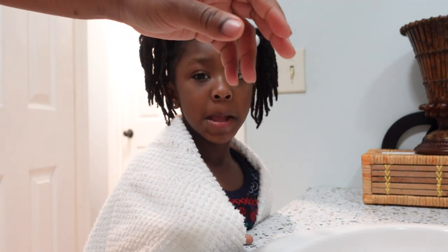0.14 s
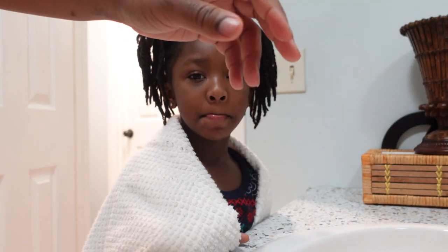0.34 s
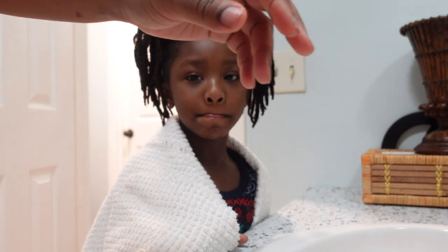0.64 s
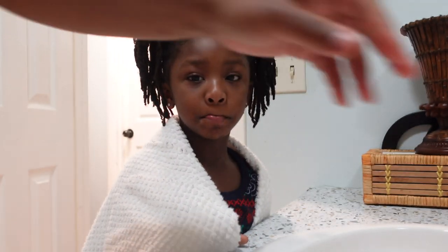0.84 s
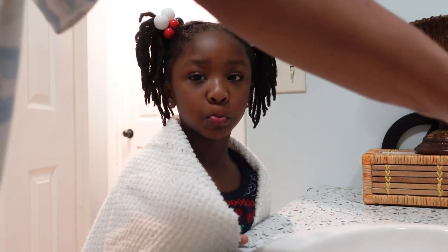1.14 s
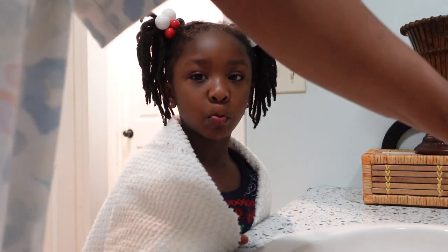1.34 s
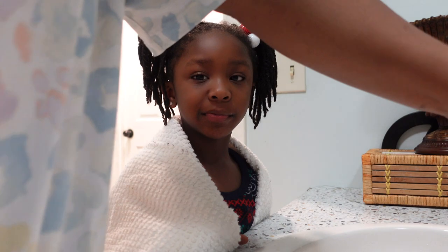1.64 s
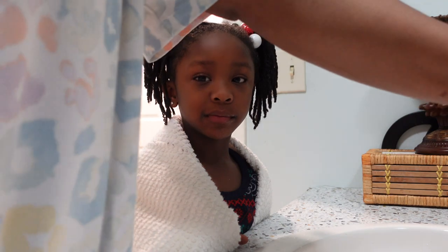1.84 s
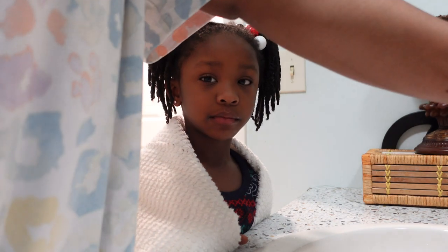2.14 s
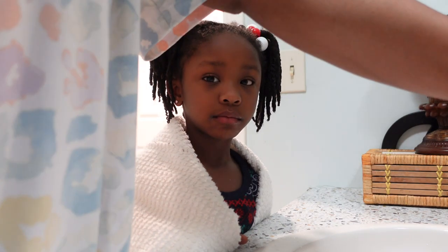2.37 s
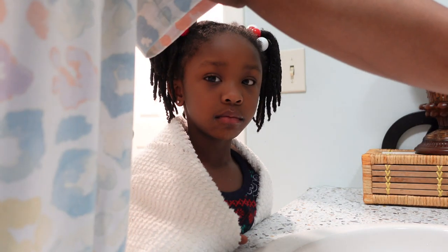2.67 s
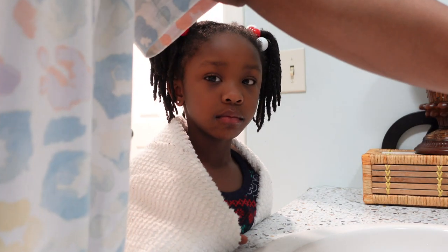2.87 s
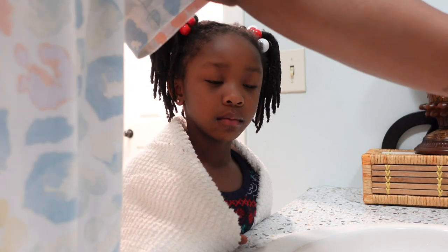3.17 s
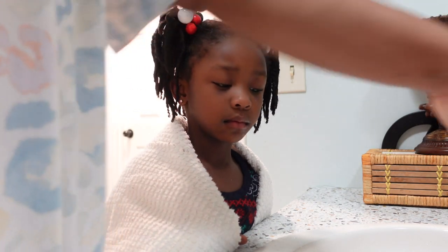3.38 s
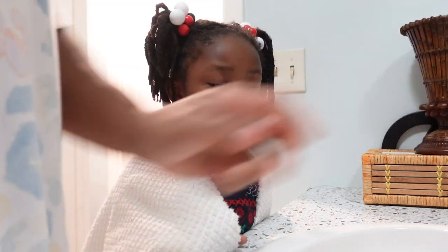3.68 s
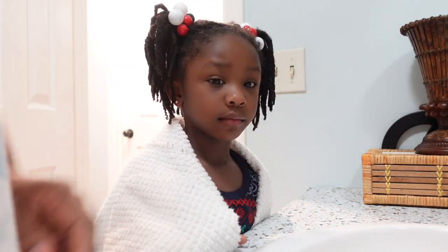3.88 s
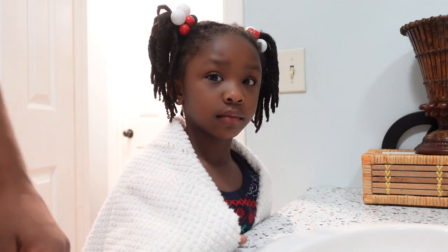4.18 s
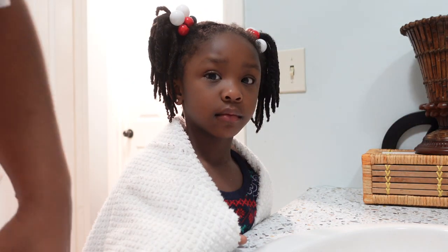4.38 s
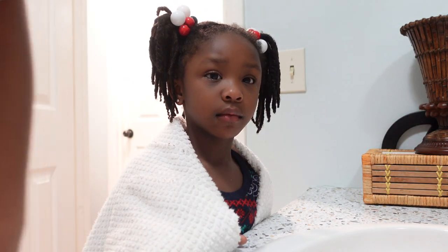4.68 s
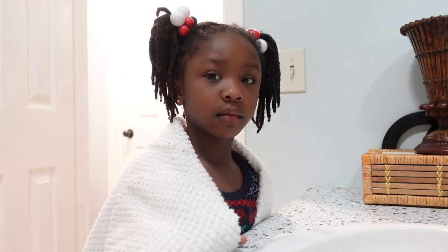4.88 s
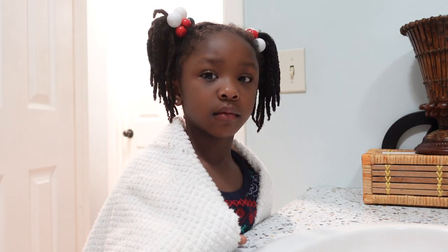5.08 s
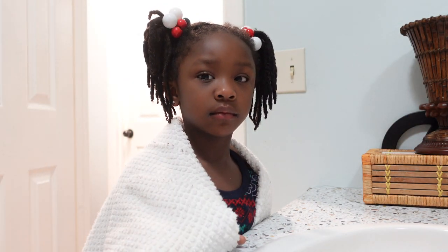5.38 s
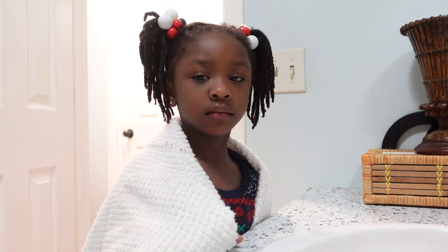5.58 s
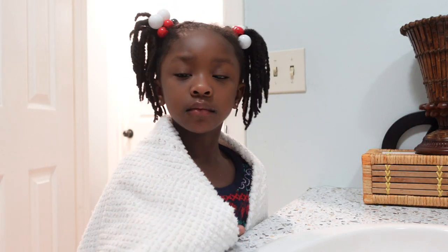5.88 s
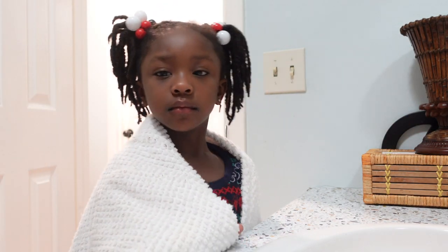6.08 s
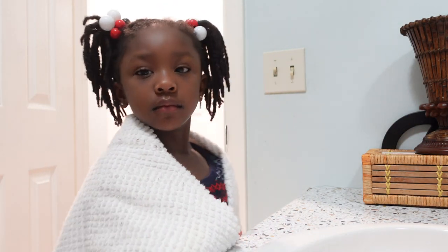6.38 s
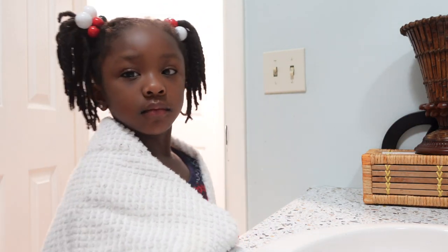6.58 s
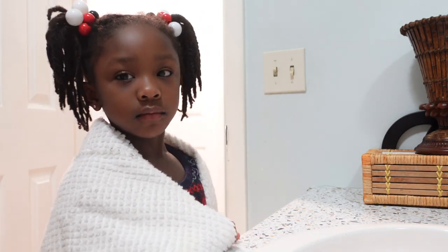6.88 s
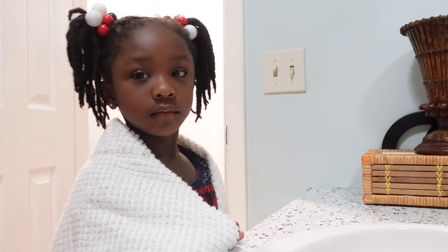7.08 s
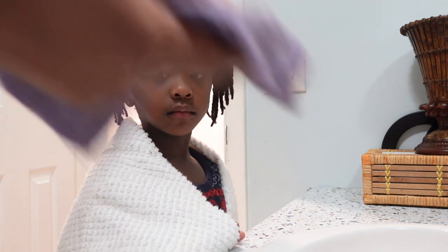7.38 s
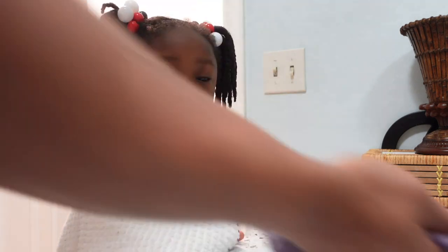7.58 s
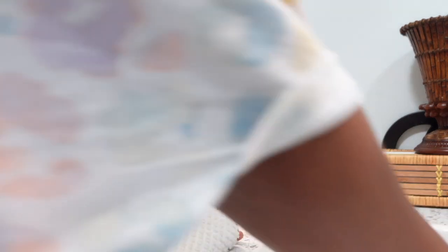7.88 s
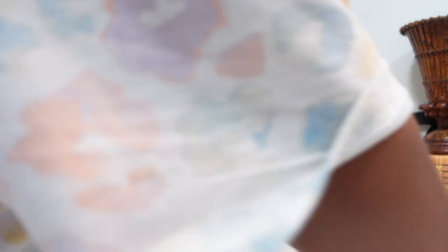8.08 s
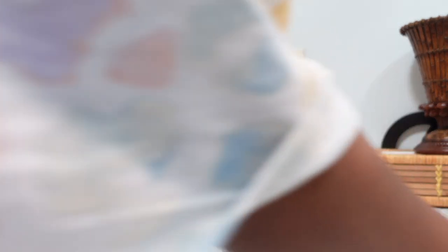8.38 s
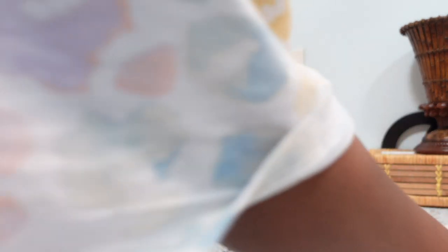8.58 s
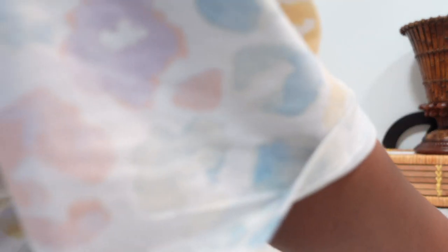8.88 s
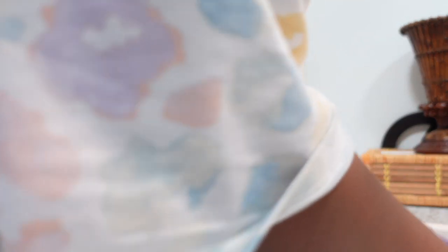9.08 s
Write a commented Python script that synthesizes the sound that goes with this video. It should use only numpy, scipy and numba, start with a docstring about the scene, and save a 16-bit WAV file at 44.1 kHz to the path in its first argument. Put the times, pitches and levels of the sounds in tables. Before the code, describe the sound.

A small bathroom holds a quiet steady rush with a faint whistle, a few light handling ticks and one soft bloop. Then a tap opens, close and to the right of the microphone, and runs hard into the sink. The jet hisses, spray patters on the bowl, water bubbles and the filling drain gulps now and then. Near the end a cloth softens the stream, which keeps running.

```python
"""First a steady rush with a faint whistle in a small bathroom, a few handling ticks and one soft bloop.
At 1.8 s the tap opens, right of the microphone, and runs hard into the basin: jet and valve hiss, spray
patters on the bowl, bubbles ring in the churned water and trapped air throbs and gulps in the filling
drain. Near the end a cloth softens the stream. Close, hard walls add a short tail."""
import sys
import numpy as np
from scipy import signal
from scipy.fft import rfft, irfft, next_fast_len
from scipy.io import wavfile
from numba import njit

SR = 44100
rng = np.random.default_rng(int(sys.argv[2]) if len(sys.argv) > 2 else 0)


def materialize(psi):
    """Save the field psi as 16-bit PCM at rate SR to the path in sys.argv[1].

    A 1-D psi becomes a single channel; in a 2-D psi each row is a channel.
    """
    bounded = np.clip(np.atleast_2d(psi).T, -1, 1)
    quanta = np.round(bounded * 32767).astype(np.int16)
    wavfile.write(sys.argv[1], SR, quanta)


N = 407043
TIME = np.arange(N) / SR

# spectral shapes of room tone, jet and spray: f/Hz, relative level/dB
RUSH_SPECTRUM = [(40, -36), (85, -11), (135, -0.5), (300, 3.5), (450, -15), (650, -4.5), (1400, -8.5),
                 (2800, -14), (7000, -32.5), (16000, -41)]
JET_SPECTRUM = [(100, -12), (200, -11.5), (500, -16.5), (1300, -24), (2500, -4.5), (5000, -1), (9000, 2),
                (16000, -10.5)]
SPRAY_SPECTRUM = [(500, -15), (1200, -10), (2400, 0.5), (3000, 2.5), (4500, -2.5), (6500, 1), (9000, -1),
                  (12000, -25), (16000, 0)]
# handling ticks and thuds at the tap: t/s, level/dB, centre f/Hz, decay/s
HANDLING_TICKS = [(.615, -39.5, 2000, .007), (.64, -41, 520, 0.032), (1.036, -50.5, 8140, 0.018),
                  (1.052, -38, 132, .025), (1.312, -55, 8500, .016), (1.476, -37, 202, .028),
                  (1.515, -55, 6500, .022), (1.82, -37.5, 164, 0.069), (2.15, -35.5, 190, .12)]
# the tap opens in two turns: t/s, relative flow level/dB
TAP_FLOW = [(1.8, -8), (2.0, -5), (2.22, -3), (2.33, 3.5)]
# pitch of the bubble cloud, sinking as the cloud grows: t/s, f/Hz
CLOUD_PITCH = [(1.85, 1070), (4.0, 1063), (4.8, 1017), (7.6, 970), (7.95, 834), (9.2, 840)]
# the drain swallows harder for a moment: t/s, level/dB, length/s
DRAIN_SURGES = [(2.301, -32, .06), (2.88, -26, 0.093), (3.253, -34, 0.11), (4.064, -35, 0.39),
                (4.334, -27, 0.043), (5.2, -36, .25)]
# the jet hits the drain mouth squarely: t/s, level/dB, length/s
MOUTH_HITS = [(2.176, -23, 0.044), (2.277, -21, 0.043), (2.897, -27.5, .06), (3.299, -26, .035)]
# modes of the metal drain fitting: f/Hz, width/Hz, relative level/dB
FITTING_MODES = [(2624, 114, 13.5), (3070, 210, 7.5), (3925, 116, 18), (5240, 870, 9)]
# the loudest splashes: t/s, level/dB, centre f/Hz, decay/s
LOUD_SPLASHES = [(2.386, -20, 3950, 0.0087), (2.619, -15, 4000, 0.0063), (2.678, -17, 2640, 0.017),
                 (2.92, -31, 810, .05), (2.988, -12, 4060, 0.0086), (3.05, -19, 3100, .03),
                 (3.281, -15.5, 2430, .011), (3.437, -20.5, 2760, 0.016), (3.726, -15, 3750, 0.03),
                 (4.209, -20, 2650, .016), (4.674, -9.5, 2600, 0.0051), (4.772, -19, 4740, 0.012),
                 (4.997, -18, 3860, 0.021), (5.198, -15, 4300, 0.011), (5.447, -18, 8600, 0.014),
                 (5.742, -17.5, 9600, 0.017), (5.94, -21, 2100, .05), (6.036, -16.5, 3150, 0.0099),
                 (6.104, -16.5, 5000, 0.013), (6.765, -15, 4600, 0.0098), (7.207, -16.5, 2980, 0.015),
                 (7.49, -18.5, 4900, 0.042), (7.7, -21.5, 1320, 0.062)]
# gulps of air in the drain: t/s, level/dB, f/Hz
DRAIN_GULPS = [(2.812, -6.5, 358), (3.203, -13, 358), (3.205, -5, 1160), (3.3, -11, 1140),
               (4.291, -13.5, 286), (4.299, -4.5, 1166), (4.609, -18.5, 279.4), (6.223, -21.5, 278),
               (7.547, -17, 293)]
# resonances of bowl and pipework: f/Hz, width/Hz, lift/dB
BOWL_MODES = [(1410, 50, 4), (1740, 150, 6), (1900, 80, 8.5), (2225, 40, 4), (2615, 60, 4), (3310, 110, 8),
              (4020, 220, 6), (4780, 70, 3), (5910, 100, 2), (6420, 70, 4), (7400, 330, 2), (11700, 200, 3),
              (13580, 520, 3)]
# the basin as heard from the microphone: f/Hz, left minus right level/dB
BASIN_BALANCE = [(250, -1.5), (1000, -4.2), (2000, -2.3), (4500, -4.2), (10000, 0)]

OPENING_S = (1.771, 1.803)   # the valve goes from shut to open
COVER_AT_S, COVER_TAKES_S = 2.29, 1.31   # water spreads over the drain fitting
FLOOD_AT_S, FLOOD_TAKES_S = 4.22, 0.29   # the drain floods
CLOTH_AT_S, CLOTH_TAKES_S = 7.6, 0.26   # a cloth is held in the stream


def from_db(db):
    """Decibels to gain."""
    return 10 ** (np.asarray(db) / 20)


def unit_rms(x):
    """Scale to an rms of 1."""
    return x / np.sqrt(np.mean(x ** 2) + 1e-20)


def at_hz(points, hz):
    """Read a spectrum on a log-frequency axis."""
    f, value = np.transpose(points)
    return np.interp(np.log(hz + 1e-9), np.log(f), value)


def ramp(at_s, takes_s):
    """Go from 0 to 1, starting at at_s."""
    return np.clip((TIME - at_s) / takes_s, 0, 1)


def swells(steady, rows):
    """A gain with bell-shaped swells added in power."""
    power = sum(from_db(db) ** 2 * np.exp(-2 * np.minimum(((TIME - s) / length) ** 2, 20))
                for s, db, length in rows)
    return np.sqrt(steady ** 2 + power)


def drift(rate_hz):
    """A smooth random wander of spread 1."""
    pole = np.exp(-80 * np.pi * rate_hz / SR)
    slow = signal.lfilter([1], [1, -2 * pole, pole * pole], rng.standard_normal(N // 40 + 2002))[2000:]
    return np.interp(np.arange(N) / 40, np.arange(len(slow)), unit_rms(slow))


def band(x, low_hz, high_hz):
    """Butterworth band-pass."""
    edges = [low_hz, min(high_hz, SR / 2 - 1000)]
    return signal.sosfilt(signal.butter(2, edges, "band", fs=SR, output="sos"), x)


def resonate(x, hz, width_hz, passes=1):
    """A steady resonance with gain 1 at its peak."""
    r = np.exp(-np.pi * width_hz / SR)
    feedback = [1, -2 * r * np.cos(2 * np.pi * hz / SR), r * r]
    for _ in range(passes):
        x = signal.lfilter(np.array([1, 0, -1]) * (1 - r * r) / 2, feedback, x + 1e-18)
    return x


@njit
def glide(x, hz, width_hz, passes):
    """A resonance whose centre moves."""
    out = x.copy()
    for _ in range(passes):
        state = 0j
        for i in range(len(x)):
            state = state * np.exp((2j * hz[i] - width_hz) * np.pi / SR) + out[i]
            out[i] = state.real
    return out


def impacts(per_s, spread_db):
    """Random clicks, many small and a few large."""
    sizes = from_db(spread_db * np.minimum(rng.exponential(1, N), 6)) * rng.choice([-1, 1], N)
    return unit_rms(sizes * (rng.random(N) < per_s / SR))


def colour(sources, spectrum, flicker_db, flicker_hz):
    """Half-octave bands drawn in turn from two sources; neighbours flare up together."""
    edges = 31 * 2 ** (np.arange(20) / 2)
    out, below = 0, drift(flicker_hz)
    for k, (low, high) in enumerate(zip(edges, edges[1:])):
        above = drift(flicker_hz)
        band_db = at_hz(spectrum, np.sqrt(low * high)) + flicker_db * (below + above)
        out = out + band(sources[k % 2], low, high) * from_db(band_db)
        below = above
    return unit_rms(out)


def bursts(rows, span, spread_db, attack_share=.35):
    """Clusters of clicks that rise quickly and die away, each in its own band."""
    out, clicks = np.zeros(N), impacts(9000, spread_db)
    for s, db, hz, decay in rows:
        live = slice(int(s * SR), int((s + 5 * decay) * SR))
        age = (TIME[live] - s) / decay
        grains = unit_rms(band(clicks[live], hz / (1 + span), hz * (1 + span)))
        out[live] += from_db(db) * grains * np.clip(age / attack_share, 0, 1) * np.exp(attack_share - age)
    return out


def room_rush(db=-45, whistle_db=-47, fade_db_per_s=3):
    """Room tone around the microphone: a steady rush and a faint two-note whistle that dies away."""
    white = rng.standard_normal((2, N))
    low_note = resonate(white[0], 885, 26, passes=2)
    high_note = resonate(resonate(white[1], 1040, 140), 1230, 110)
    whistle = from_db(whistle_db - fade_db_per_s * TIME) * unit_rms(low_note + 0.49 * high_note)
    return from_db(db) * colour(white, RUSH_SPECTRUM, flicker_db=0.6, flicker_hz=28) + whistle


def handling():
    """A hand at the tap makes small ticks and thuds."""
    return bursts(HANDLING_TICKS, span=0.33, spread_db=3)


def bloop(at_s, hz, db, length_s):
    """One soft, nearly pure note swells and stops."""
    return from_db(db) * np.exp(-((TIME - at_s) / length_s) ** 2) * np.sin(2 * np.pi * hz * TIME)


def jet(cloth, db=-31, cloth_db=-1.5):
    """The aerated stream hisses smoothly, a little less in the cloth."""
    hiss = colour(rng.standard_normal((2, N)), JET_SPECTRUM, flicker_db=.3, flicker_hz=20)
    return from_db(db + cloth_db * cloth) * hiss


def spray(flow_db, covered, cloth, db=-28.5, wet_db=2, cloth_db=-2.5):
    """Droplets patter on the bowl in clumps; the cloth softens and steadies them."""
    drops = [impacts(per_s=4500, spread_db=2.5) for _ in range(2)]
    unrest_db = 0.46 + 0.59 * from_db(flow_db) * (1 - cloth)
    patter = colour(drops, SPRAY_SPECTRUM, flicker_db=unrest_db, flicker_hz=29)
    level_db = db + flow_db + wet_db * covered + cloth_db * cloth
    return from_db(level_db + unrest_db * drift(93)) * patter


def bubbles(low_hz, high_hz, per_s, cycles, spread_db, sizes=16):
    """Bubbles of assorted sizes, each ringing briefly."""
    births, size = impacts(per_s, spread_db), rng.integers(0, sizes, N)
    pitches = np.geomspace(low_hz, high_hz, sizes)
    return unit_rms(sum(resonate(births * (size == k), hz, 2 * hz / cycles)
                        for k, hz in enumerate(pitches)))


def pinch_off(rows, attack_s, rise):
    """Bubbles pinch off and ring, rising slightly in pitch as they die."""
    out = np.zeros(N)
    for s, db, hz, t60 in rows:
        live = slice(int(s * SR), int((s + t60) * SR))
        age = TIME[live] - TIME[live.start]
        envelope = from_db(db - 60 * age / t60) * (1 - np.exp(-age / attack_s))
        out[live] += envelope * np.sin(2 * np.pi * hz * age * (1 + rise * age / t60))
    return out


def plinks(low_hz, high_hz, cycles, spread_db, count=420):
    """Single small bubbles stand out with a clear pitch."""
    when, size, strength = rng.random((count, 3)).T
    hz = low_hz * (high_hz / low_hz) ** size
    rows = zip(when * TIME[-1], -spread_db * strength, hz, cycles / hz)
    return pinch_off(rows, attack_s=0.0021, rise=0.076)


def churn():
    """Where the jet plunges, small bubbles ring and the hollow of the basin sounds."""
    small = bubbles(low_hz=1490, high_hz=2155, per_s=2500, cycles=13.4, spread_db=2)
    hollow = unit_rms(resonate(impacts(830, 2), hz=1854, width_hz=120, passes=2))
    return unit_rms(small + 0.16 * hollow)


def froth():
    """Larger bubbles ring singly and swing together as a cloud."""
    single = bubbles(low_hz=970, high_hz=1480, per_s=3000, cycles=6.2, spread_db=4)
    cloud_hz = np.interp(TIME, *np.transpose(CLOUD_PITCH))
    cloud = unit_rms(glide(impacts(2500, 2.86), cloud_hz, width_hz=260., passes=2))
    return unit_rms(from_db(-1.5) * single + cloud)


def bubbling(gather_s=0.73, churn_db=-30, froth_db=-31.5):
    """Churn, plinks and froth grow as the pool deepens."""
    shallow = np.exp(-np.maximum(TIME - OPENING_S[0], 0) / gather_s)
    pings = from_db(8.5) * plinks(low_hz=1607, high_hz=5604, cycles=156, spread_db=6.5)
    small = from_db(churn_db - 23 * shallow) * (churn() + pings)
    return small + from_db(froth_db - 12.5 * shallow) * froth()


def drain_cavity(flow_db, cloth, open_hz=364, flooded_hz=266, climb_hz_per_s=8, db=-43, cloth_db=-3):
    """Air trapped in the drain throbs, lower once it floods; the cloth shields it from the jet."""
    climbing_hz = flooded_hz + climb_hz_per_s * (TIME - FLOOD_AT_S)
    hz = open_hz + (climbing_hz - open_hz) * ramp(FLOOD_AT_S, FLOOD_TAKES_S)
    ring = glide(impacts(700, 2.9), hz, width_hz=40., passes=1)
    throb = unit_rms(band(ring, 237, 400))
    return swells(from_db(db + flow_db + cloth_db * cloth), DRAIN_SURGES) * throb


def drain_mouth(covered, bare_hz=1890, sink_hz=850, db=-31.5):
    """The jet drums in the drain mouth, sinking in pitch and fading as water covers it."""
    hz = bare_hz - sink_hz * np.sqrt(covered)
    drum = unit_rms(glide(impacts(3000, 1.8), hz, width_hz=190., passes=2))
    return swells(from_db(db) * (1 - covered), MOUTH_HITS) * drum


def drain_fitting(flow_db, covered, db=-25, covered_db=-7.5):
    """The jet rings the metal fitting, more softly under water."""
    hits = impacts(per_s=4500, spread_db=3.8)
    metal = sum(from_db(level) * resonate(hits, hz, width) * (-1) ** k
                for k, (hz, width, level) in enumerate(FITTING_MODES))
    return from_db(db + flow_db + covered_db * covered ** 2) * unit_rms(metal)


def valve_hiss(start_hz=5870, climb_hz=1100, waver_hz=69, db=-29, fade_at_s=3.14, fade_s=0.32):
    """Water squeezing through the valve excites a resonance that wavers, climbs and fades as it opens."""
    opened = ramp(COVER_AT_S, fade_at_s + fade_s - COVER_AT_S)
    hz = start_hz + climb_hz * opened ** 3 + waver_hz * drift(9.2)
    hiss = unit_rms(glide(rng.standard_normal(N), hz, width_hz=800., passes=2))
    return from_db(db) * (1 - ramp(fade_at_s, fade_s)) * hiss


def splashes(small_db=-22, low_hz=2600, high_hz=9000, decay_s=0.015, count=16):
    """Loud splashes, and smaller ones at random while the full stream falls freely."""
    free_fall_s = CLOTH_AT_S - COVER_AT_S
    small = [(COVER_AT_S + when * free_fall_s, small_db, low_hz * (high_hz / low_hz) ** size, decay_s)
             for when, size in rng.random((count, 2))]
    return bursts(LOUD_SPLASHES + small, span=0.19, spread_db=-0.5)


def sizzle(covered, cloth, db=-42, cloth_db=3.5):
    """A fine, very high sizzle comes in with the standing water and grows with the cloth."""
    fizz = unit_rms(resonate(impacts(9000, 2), hz=13400, width_hz=800, passes=2))
    return from_db(db + cloth_db * cloth) * covered * fizz


def gulps(cycles=37.5):
    """Big bubbles pinch off in the drain; the lower ones ring longer."""
    return pinch_off([(s, db, hz, cycles / hz) for s, db, hz in DRAIN_GULPS], attack_s=0.0026, rise=0.01)


def bowl(x):
    """The basin lifts its own resonances."""
    for hz, width, lift_db in BOWL_MODES:
        x = x + (from_db(lift_db) - 1) * resonate(x, hz, width)
    return x


def bathroom(x, side_db, tail_db=-7.5, t60_s=0.21):
    """Hard walls close to the microphone add a short stereo tail."""
    age = TIME[:SR // 2]
    mid, side = rng.standard_normal((2, len(age))) * from_db(-60 * age / t60_s)
    spread = from_db(side_db) * band(side, 50, 6400) * [[1], [-1]]
    tail = from_db(tail_db) * (mid + spread) / np.linalg.norm(mid)
    reflections = signal.fftconvolve(x[None], tail, axes=1)[:, :N]
    return (x + reflections) / np.sqrt(1 + from_db(tail_db) ** 2)


def to_the_right(x):
    """The basin stands right of the microphone; the lean varies with frequency."""
    size = next_fast_len(N + SR // 10)
    lean_db = at_hz(BASIN_BALANCE, np.arange(size // 2 + 1) * SR / size)
    return irfft(rfft(x, size) * from_db(lean_db * [[.5], [-.5]]), size)[:, :N]


def scene():
    """Room tone throughout; water on the right once the valve opens."""
    flow_db = np.interp(TIME, *np.transpose(TAP_FLOW))
    valve = np.interp(TIME, OPENING_S, [0, 1])
    covered, cloth = ramp(COVER_AT_S, COVER_TAKES_S), ramp(CLOTH_AT_S, CLOTH_TAKES_S)
    water = bowl(jet(cloth) + spray(flow_db, covered, cloth) + bubbling())
    water += drain_cavity(flow_db, cloth) + drain_mouth(covered) + drain_fitting(flow_db, covered)
    water += valve_hiss() + splashes() + sizzle(covered, cloth)
    basin = bathroom(valve * water + gulps(), side_db=-8.5)
    ambience = bathroom(room_rush() + handling(), side_db=-3)
    return ambience + bloop(at_s=.826, hz=610, db=-28, length_s=0.013) + to_the_right(basin)


def record(dry):
    """The small microphone loses the deep bass and the highest treble; the top is cut steeply."""
    thin = signal.sosfilt(signal.butter(3, 76, "high", fs=SR, output="sos"), dry)
    soft = signal.sosfilt(signal.butter(2, 14800, fs=SR, output="sos"), thin)
    return signal.sosfilt(signal.ellip(12, .1, 80, 15750, fs=SR, output="sos"), soft)


dry = scene()
out = record(dry)
materialize(out)
```